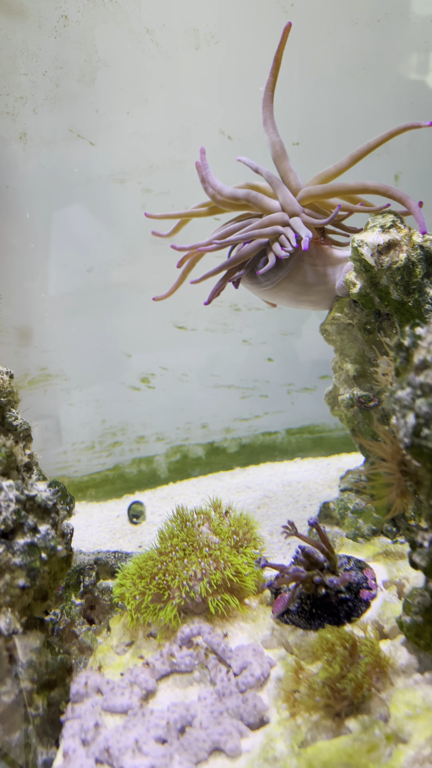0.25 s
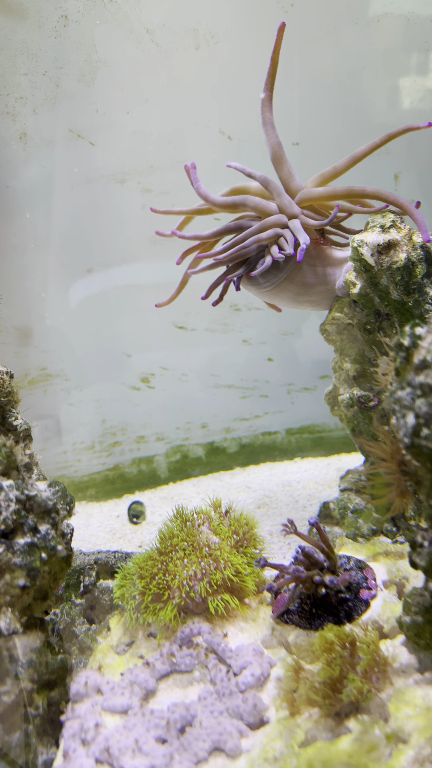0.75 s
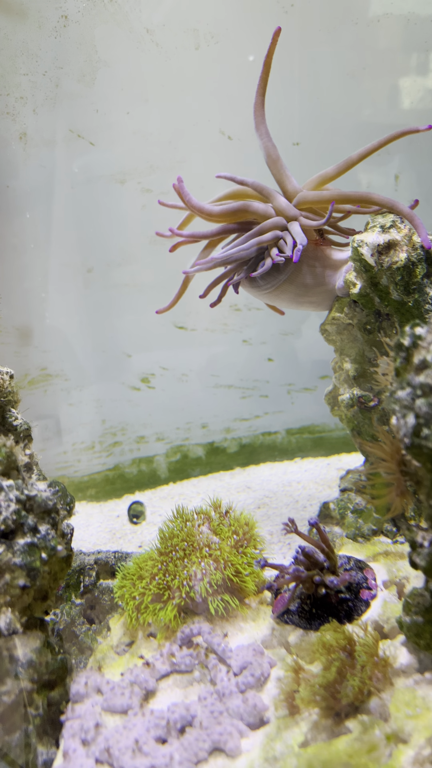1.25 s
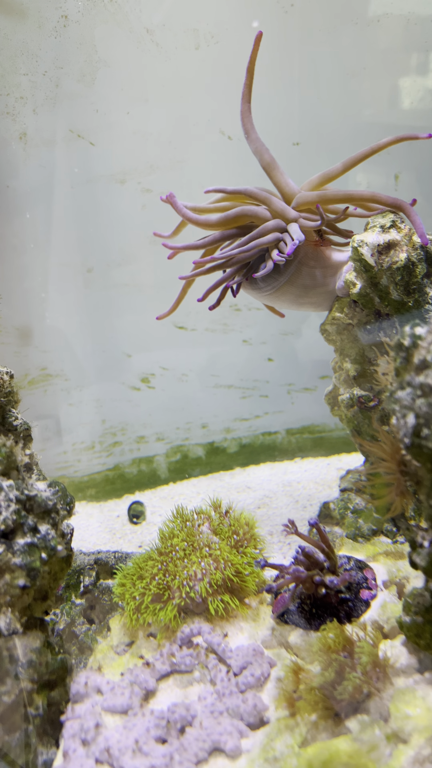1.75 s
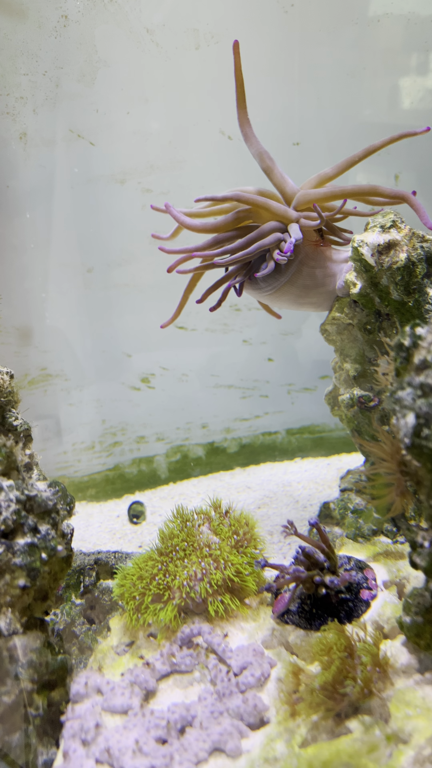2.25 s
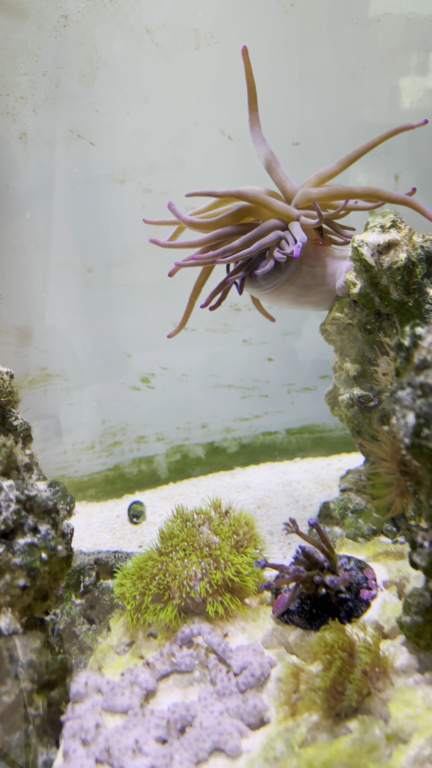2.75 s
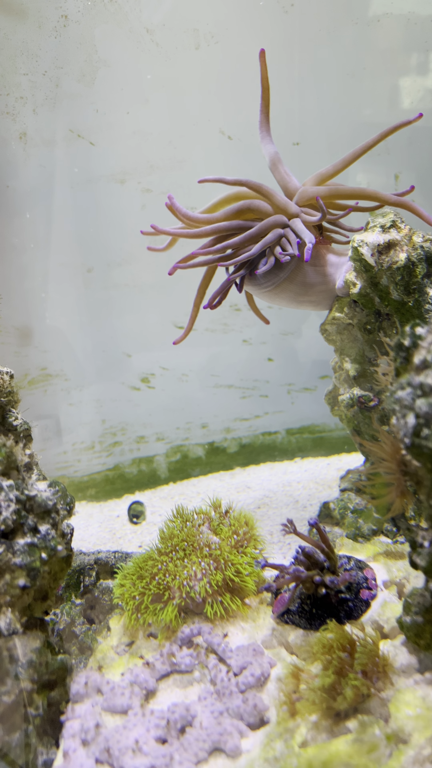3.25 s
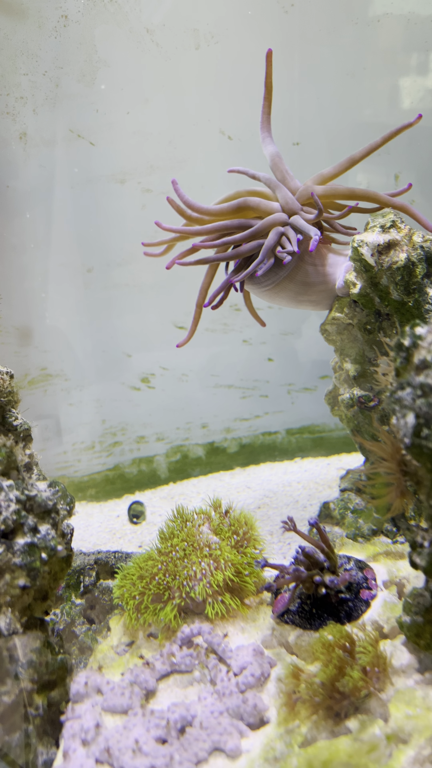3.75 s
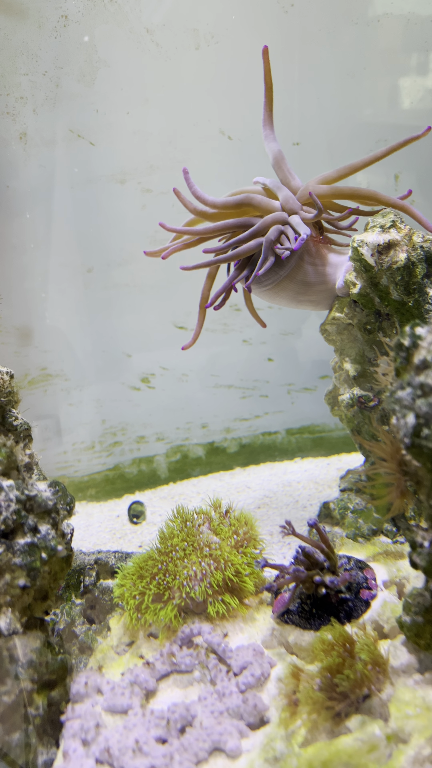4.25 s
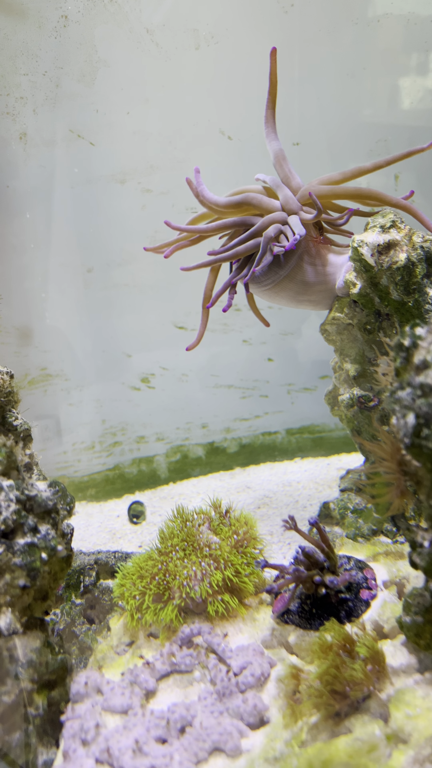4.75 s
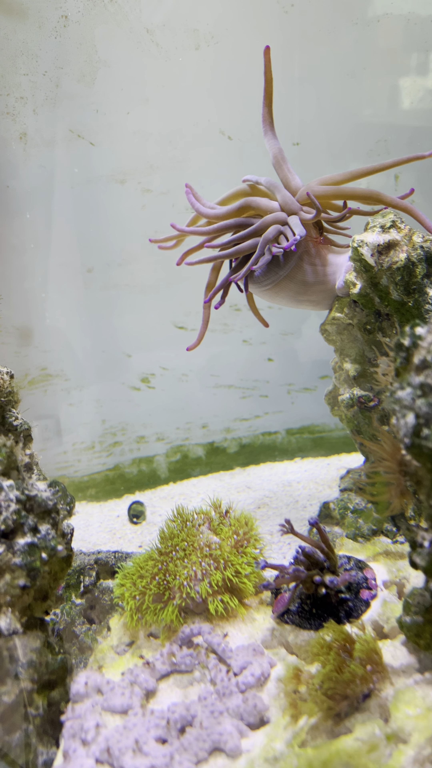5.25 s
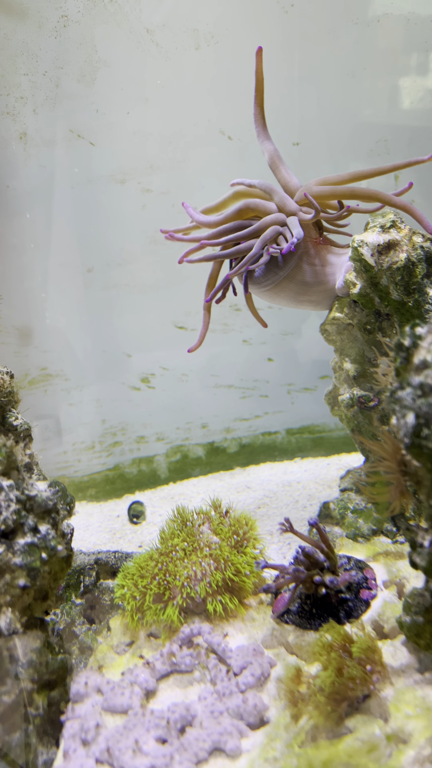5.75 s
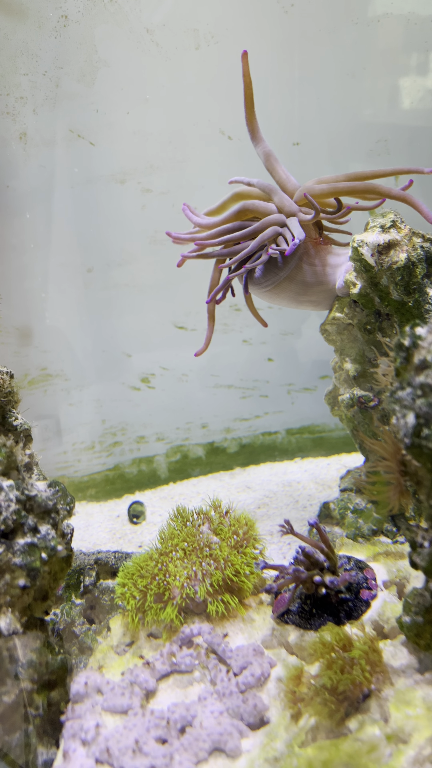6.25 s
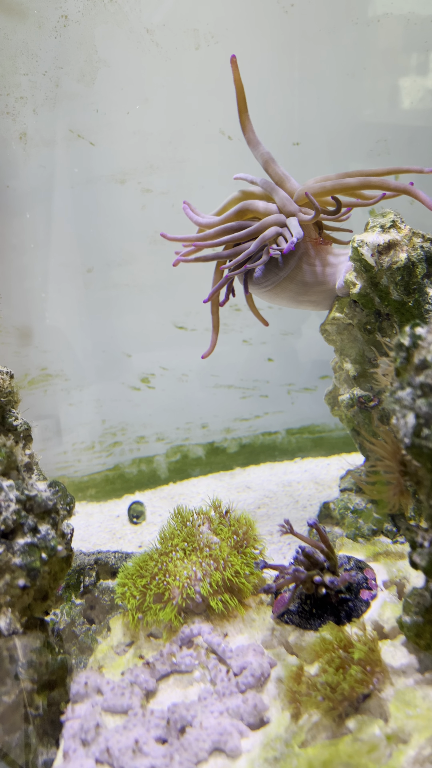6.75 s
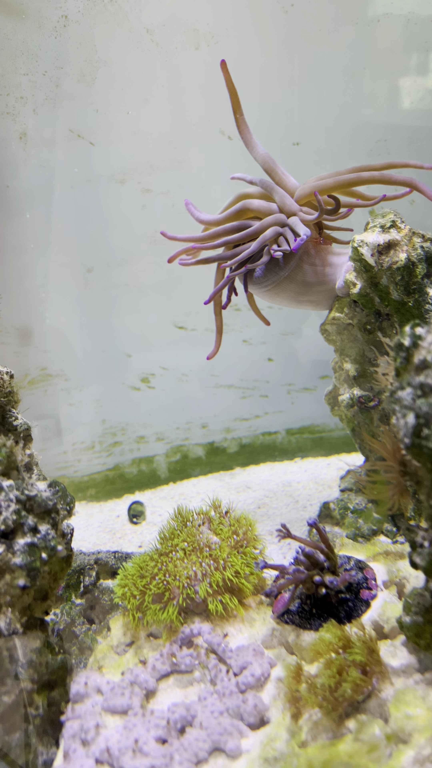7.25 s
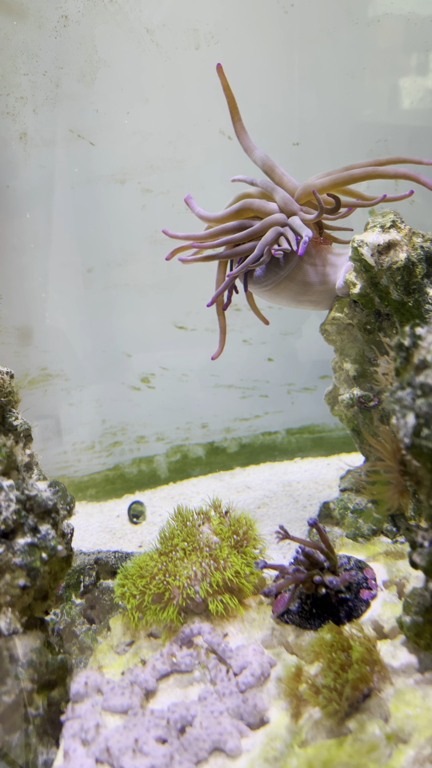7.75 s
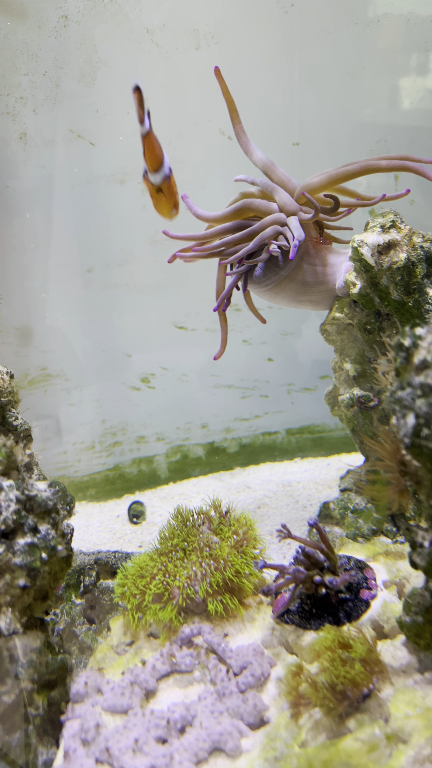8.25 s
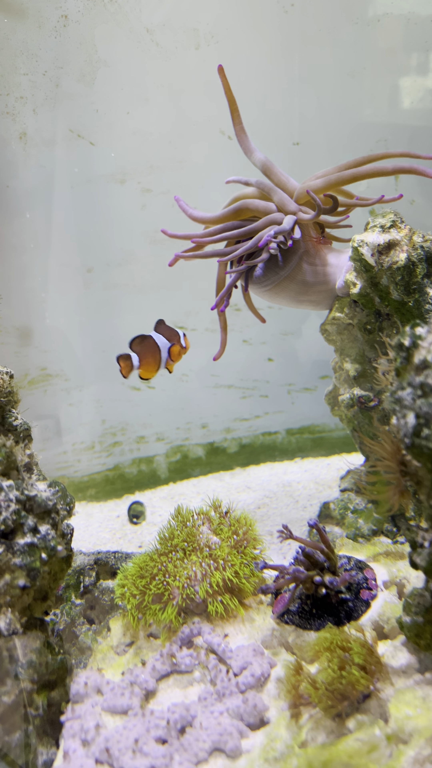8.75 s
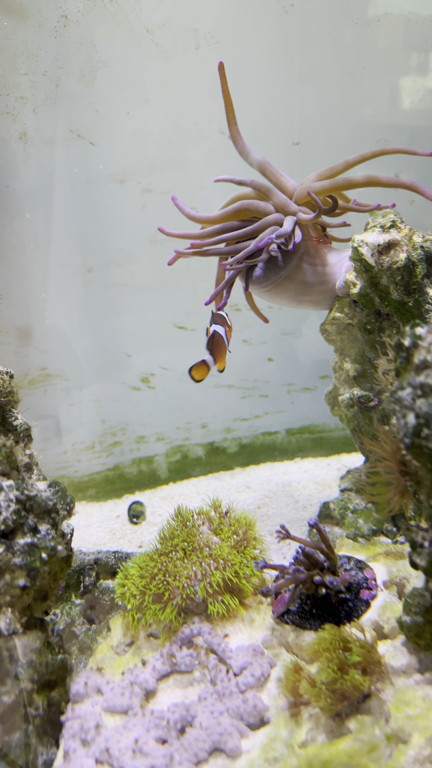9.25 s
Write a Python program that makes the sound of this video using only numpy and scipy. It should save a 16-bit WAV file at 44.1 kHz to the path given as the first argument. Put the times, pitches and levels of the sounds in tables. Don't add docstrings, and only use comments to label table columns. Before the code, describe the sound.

A tank pump hums deeply while thin water splashes and ticks; a few hard snaps early, a booming thud midway, gurgles late.

```python
import sys
import numpy as np
from scipy import signal
from scipy.fft import rfft, irfft, next_fast_len
from scipy.io import wavfile
from scipy.ndimage import uniform_filter1d

SR = 44100
rng = np.random.default_rng(int(sys.argv[2]) if len(sys.argv) > 2 else 0)


def transcribe(signal):
    frames = np.atleast_2d(signal).T
    limited = np.clip(frames, -1, 1)
    pcm = np.round(limited * 32767).astype(np.int16)
    wavfile.write(sys.argv[1], SR, pcm)


def invert_db(level):
    return 10 ** (np.asarray(level, dtype=float) / 20)


N = 419391
T = np.arange(N) / SR
FFT_LEN = next_fast_len(N + SR)
HZ = np.fft.rfftfreq(FFT_LEN, 1 / SR) + 1e-3

# [t/s, f/Hz, level/dB]
LORRY_ENGINE = [
    (0, 40.05, -64),
    (.15, 41.8, -45),
    (.38, 45.34, -39.5),
    (.6, 47.2, -45.5),
    (.9, 50.5, -44),
    (1.05, 54.7, -51),
    (1.2, 59.9, -49),
    (1.4, 60.3, -50),
]
# [multiple of mains, rms level/dB]
HUM_PARTIALS = [(1, -58), (2, -35), (3, -66), (4, -70), (5, -57), (6, -66), (7, -67), (8, -70), (9, -73),
                (10, -71), (11, -72), (12, -72), (14, -80), (15, -82)]
# [t/s, level/dB]
HUM_SWAY = [(0, 1), (1.7, 0.5), (2.4, 0), (3.7, 0), (4.5, 0), (9.6, 0)]
# [f/Hz, level/dB per Hz]
RUMBLE_COLOUR = [(22, -22.5), (35, -8), (48, -1.5), (70, -0.5), (88, -3), (105, -8.5), (150, -0.5),
                 (180, -4), (225, -13), (285, -1.5), (330, -10), (460, -12), (700, -22.5), (780, -30.5)]
# [t/s, level/dB]
RUMBLE_SWELL = [(0, -1.5), (1, 0.5), (2, 0.5), (3, 0), (4, 0), (5, -0.5), (6, -1), (7, -1), (8, 0),
                (9.6, -0.5)]
# [f/Hz, level/dB per Hz]
TRICKLE_COLOUR = [(350, -35), (600, -6), (726, -2.5), (892, -6.5), (1190, -7.5), (1650, -13), (2480, -20),
                  (3310, -29), (4410, -41.5), (4850, -28), (8970, -42), (11200, -47), (15700, -45)]
# [f/Hz, width/Hz, level/dB]
CAVITIES = [
    (2580, 710, -75.5),
    (3040, 200, -89),
    (4355, 300, -78),
    (5750, 670, -78),
    (8680, 420, -81.5),
]
# [t/s, level/dB]
JET_LEVEL = [(0, -95), (7.45, -95), (7.53, -68), (7.75, -70), (7.85, -85), (8.1, -82), (8.25, -73),
             (8.4, -75), (8.5, -70), (8.58, -76), (8.65, -90), (9.6, -95)]
# [f/Hz, level/dB per Hz]
SPLASH_COLOUR = [(2060, -21.5), (3500, -17.5), (4530, 2), (5370, 0), (6850, 4.5), (7800, 0.5), (8880, 3),
                 (10500, -6.5), (11800, -17.5), (15000, -46.5), (22000, -120)]
# [t/s, level/dB]
WEIR_FLOW = [(0, -73.5), (.4, -79.5), (.75, -77), (1.1, -70), (1.6, -72.5), (2.5, -69.5), (3.2, -72),
             (3.9, -73.5), (4.6, -80.5), (5.05, -67), (5.25, -81), (5.9, -75), (6.5, -79), (6.65, -74),
             (7.1, -72), (7.9, -75), (8.9, -80), (9.51, -88)]
# [peak t/s, level/dB, 10 dB rise/s, 10 dB fall/s, spray level/dB]
POURS = [(.48, -71, 0.3, 0.2, -24), (.93, -67, 0.07, 0.1, -21), (.975, -60.5, 0.1, -0.04, -17),
         (1.3, -62, 0.26, 0.12, -11), (2.045, -58.5, -0.11, 0.3, -24), (2.15, -62, .08, 0.15, -22),
         (2.27, -59.5, .09, 0.1, -13.5), (2.89, -61.5, 0.18, 0.15, -21), (3.345, -66.5, -0.07, 0.14, -11),
         (3.48, -63.5, 0.07, 0, -25), (3.68, -59.5, 0.13, 0.11, -19), (4.06, -70, -0.4, 0.3, -16),
         (4.16, -63.5, 0.06, 0.12, -13), (4.39, -66.5, .12, 0.1, -15.5), (4.48, -70, 0, -0.3, -23),
         (6.96, -65.5, -0.4, 0.06, -15), (8.18, -65.5, 0.24, 0.1, -26), (9.05, -64, 0.16, 0.22, -22),
         (9.28, -69, .07, 0.2, -16)]
# [peak t/s, level/dB, 10 dB rise/s, 10 dB fall/s, spray level/dB]
SPURTS = [(0, -64, .01, 0.015, -7), (.26, -59.5, 0.006, 0.023, -23), (.83, -66, 0.023, 0.031, -8.5),
          (1.85, -66.5, 0.14, 0.085, -12.5), (1.99, -59, 0.035, 0.034, -11.5), (2.68, -70, .03, 0.066, -13),
          (3.58, -57.5, 0.049, 0.052, -19), (3.66, -47, 0.0085, .03, -26), (4.72, -53, 0.028, 0.055, -18.5),
          (5.35, -71, 0.066, .1, -31), (5.61, -78, 0.027, 0.17, -29), (7.52, -55.5, 0.032, 0.17, -14.5),
          (7.6, -55.5, 0.11, 0.12, -15), (7.69, -60, 0.11, 0.087, -12.5), (7.78, -58, 0.15, 0.061, -16),
          (8.54, -61.5, 0.12, 0.058, -23), (8.69, -62, .03, 0.07, -15.5), (8.73, -60.5, .06, 0.095, -16)]
# [t/s, peak level/dB, f/Hz]
TICKS = [(0.055, -57, 8750), (.4805, -47.5, 8800), (1.428, -54, 3200), (1.731, -57, 3150),
         (2.408, -61.5, 10600), (2.511, -58, 9400), (2.641, -56, 10300), (2.674, -50.5, 9150),
         (2.714, -56, 8500), (3.032, -58, 11000), (3.478, -54, 9200), (3.522, -64, 11200),
         (3.849, -57, 8460), (3.868, -56, 5500), (3.907, -53, 8200), (3.99, -58, 8900), (4.19, -53.5, 6000),
         (4.299, -56, 4350), (4.353, -59, 10100), (4.552, -65, 11200), (4.606, -60, 5050),
         (4.957, -58, 9200), (5.115, -58, 9000), (5.115, -60, 10300), (5.309, -48, 690), (5.332, -59, 5700),
         (5.395, -65, 9650), (5.509, -57, 8300), (5.62, -59, 9400), (5.701, -60, 5500), (5.819, -67, 7900),
         (5.868, -55.5, 9200), (5.884, -69, 12600), (5.915, -55, 3080), (5.915, -58, 5500),
         (6.086, -64.5, 9200), (6.137, -65, 9400), (6.165, -69, 14200), (6.245, -57, 9050),
         (6.302, -63, 10300), (6.357, -60, 8300), (6.404, -67, 12400), (6.563, -58, 9200),
         (6.637, -61, 8300), (6.645, -67, 10300), (6.785, -66, 9600), (7.998, -64, 9400),
         (8.076, -63, 11500), (8.341, -63, 10300), (8.674, -52, 5050), (8.68, -52.5, 2780),
         (8.731, -58, 11500), (9.1, -53, 2830), (9.21, -54, 8050), (9.268, -68, 12600), (9.288, -54, 1840),
         (9.351, -64, 8500), (9.499, -49, 4600)]
# [t/s, peak level/dB, f/Hz]
CRACKLES = [(.247, -58, 7500), (.3913, -53, 6960), (.3915, -51, 3300), (.398, -53, 2600),
            (.474, -44.5, 1810), (.4745, -52, 4900), (.4772, -52, 7500), (3.677, -41.5, 7800),
            (8.171, -52, 2900), (8.194, -52, 2400), (8.198, -54.5, 3000), (8.21, -51.5, 900),
            (8.222, -50, 800), (8.298, -51.5, 2600), (8.308, -50.5, 1700), (8.329, -47.5, 600),
            (8.352, -52, 1300), (8.364, -52.5, 1500), (8.43, -54, 2000)]
# [t/s, peak level/dB, f/Hz,
# ring/cycles]
PINGS = [(0.3155, -47, 4900, 24), (.778, -67, 8200, 40), (.802, -55.5, 13700, 270), (0.807, -55, 8800, 260),
         (.812, -61, 7430, 200), (.816, -52, 8800, 280), (.818, -56, 12700, 200), (.81, -59, 10200, 200),
         (.82, -57, 14700, 250), (.827, -59, 11700, 200), (.823, -59, 6370, 250), (.826, -55, 7900, 150),
         (.831, -56, 7000, 170), (0.83, -58, 8740, 250), (3.322, -59, 4400, 50), (4.105, -62, 8600, 90),
         (1.8377, -52.5, 7460, 140), (2.797, -50.5, 670, 17), (5.276, -56.5, 4200, 30),
         (5.3404, -54, 5500, 29), (5.622, -54, 5750, 89), (6.225, -50, 1185, 28), (6.808, -68, 9050, 300),
         (7.035, -73, 4320, 200), (8.2, -54, 890, 30), (8.355, -45.5, 600, 26)]
# [t/s, peak level/dB, f/Hz, length/s]
GURGLES = [(.972, -54.5, 1500, 0.064), (.973, -56, 5000, 0.031), (7.317, -68, 9000, .06),
           (8.16, -60.5, 3040, 0.32), (8.198, -59, 2100, .045), (8.234, -52.5, 700, 0.069),
           (8.268, -59.5, 1200, 0.22), (8.282, -59.5, 2900, 0.076), (8.295, -62, 2200, 0.2),
           (8.313, -55.5, 800, 0.055), (8.334, -61, 1450, 0.1), (8.347, -65, 2500, 0.063)]
# [t/s, peak level/dB, f/Hz, ring/cycles, tail/s]
SNAPS = [(1.2323, -34, 6000, 3, 0.0045), (1.2324, -25, 8000, 5.7, 0.0045), (1.2323, -33, 2600, 3, 0.02),
         (1.2326, -35, 3600, 3.6, 0.025), (1.2326, -25, 11000, 4, .008), (1.26, -47.5, 6000, 3, 0.092),
         (1.25, -46, 14000, 4, .16), (1.2317, -19.5, 14800, 7.4, 0.044), (1.2326, -31, 5700, 6.1, 0.025),
         (1.2371, -30, 8530, 3, .03), (1.2368, -35, 2500, 6.2, 0.019), (1.2375, -30, 11000, 5, .01),
         (1.2378, -30, 14800, 6, .01), (1.245, -42, 2900, 4, .03), (1.2386, -41, 8800, 14, 0.068),
         (2.196, -28, 1240, 2.8, 0.012), (2.1957, -37.5, 1900, 5, .008), (2, -44.5, 2600, 6, .008),
         (2.1985, -40, 800, 5, .008), (2.2112, -29, 1300, 2.5, .006), (2.209, -42.5, 2600, 4.6, .008),
         (2.215, -41.5, 1800, 5, .01), (3.6488, -30, 8000, 16, 0.038), (3.6488, -32, 9600, 20, .03),
         (3.6505, -43, 980, 3, 0.0092), (3.3, -45, 2800, 4, .01), (3.6544, -34.5, 780, 6, 0.043),
         (3.682, -43.5, 3550, 12, .05), (3.6548, -29.5, 9500, 14, 0.073), (3.6553, -37, 7000, 12, 0.037),
         (3.6555, -36, 3700, 10, 0.12), (3.6549, -36.5, 16000, 11, .05), (3.655, -43.5, 2100, 3.4, .07),
         (3.66, -44, 1050, 3, 0.06), (3.655, -33, 7000, 14, 0.03), (3.664, -41.5, 3530, 11, .06)]
# [t after the knock/s, peak level/dB, f/Hz, length/s]
KNOCK_CRACK = [
    (0.0011, -41, 900, .015),
    (0, -45, 1900, .012),
    (0.013, -42, 1020, 0.065),
    (0.0026, -40.5, 620, 0.062),
    (0.0029, -40.5, 440, 0.17),
    (.004, -56.5, 5900, 0.087),
    (.017, -56, 9300, .08),
    (.012, -50.5, 15000, .06),
    (0.006, -46, 2400, 0.06),
]
# [f/Hz, level/dB, t60/s, delay/s, rise/s]
CABINET_MODES = [(80, -10, 0.14, .008, 0.014), (67.3, -5.5, .19, .05, 0.044), (132.5, -3, .13, .03, .02),
                 (147, -13, .18, .08, .025), (151, 1.5, .14, .007, 0.0075), (201, -10.5, 0.38, .022, 0.025),
                 (212, -12, .12, .008, .008), (263.6, -8, .15, .033, 0.024), (327, -17.5, .1, .004, 0.0087),
                 (360, -21, .13, .038, .015), (384, -19, 0.086, .005, .006),
                 (515, -28.5, .14, .003, 0.0065), (568, -27.5, 0.14, .002, .004),
                 (660, -19, .035, 0.0013, .0005)]
# [f/Hz, side minus mid level/dB]
STEREO_WIDTH = [(60, -32.5), (110, -44.5), (200, -21), (380, -8), (700, 0), (1290, -3.5), (2380, -4),
                (4400, -0.5), (8120, -3), (15000, -7.5)]
# [f/Hz, level/dB]
MIC_PORT = [(100, 4), (9500, 0.5), (12500, -10.5), (14500, -6.5), (20000, -8)]

MAINS_HZ = 59.986
RUMBLE_DB, TRICKLE_DB = -45.5, -59.5
JET_HZ, JET_WIDTH_HZ = 6500, 900
STEADY_BODY_DB, FLOW_BODY_DB, POUR_BODY_DB, SPURT_BODY_DB = -69.5, -3, 0.5, -5
FLOW_SPRAY_DB = -16.5
KNOCK_S, KNOCK_DB = 5.029, -9
ROOM_T60_S = 0.3
TOP_HZ = 15720


def level(x, db):
    return x * invert_db(db) / np.sqrt(np.mean(x ** 2))


def over_time(table):
    return np.interp(T, *np.transpose(table))


def shape(table):
    hz, db = np.transpose(table)
    return invert_db(np.interp(np.log(HZ), np.log(hz), db, left=-120, right=-120))


def filt(x, gain):
    return irfft(rfft(x, FFT_LEN) * gain, FFT_LEN)[..., :N]


def bump(hz, octaves):
    return np.exp(-.5 * (np.log2(HZ / hz) / (octaves / 2)) ** 2)


def resonance(hz, width_hz):
    return 1 / (1 + ((HZ - hz) / (width_hz / 2)) ** 2)


def walk(rate):
    k = int(SR / rate)
    steps = np.repeat(rng.standard_normal(N // k + 1), k)
    return uniform_filter1d(steps, k)[:N]


def spread(mid, side):
    hz, db = np.transpose(STEREO_WIDTH)
    side = filt(side, invert_db(np.interp(np.log(HZ), np.log(hz), db)))
    return np.array([mid + side, mid - side])


def grainy(spread_db):
    size = invert_db(spread_db * np.minimum(rng.exponential(size=N), 5))
    return spread(size * rng.standard_normal(N), size * rng.standard_normal(N))


def decay(t, t60):
    return np.exp(-np.log(1000) * t / t60)


def ring(t, hz, t60):
    return decay(t, t60) * np.sin(2 * np.pi * hz * t)


def room(x, tail_db):
    t = T[:SR // 2]
    tail = rng.standard_normal((2, len(t))) * decay(t, ROOM_T60_S) * (1 - np.exp(-t / 0.002))
    tail = tail / np.sqrt(np.sum(tail ** 2, axis=1, keepdims=True))
    left, right = filt(x, rfft(tail, FFT_LEN))
    return x + invert_db(tail_db) * spread(left, right)


def lorry():
    s, hz, db = np.transpose(LORRY_ENGINE)
    turn = 2 * np.pi * np.cumsum(np.interp(T, s, hz)) / SR
    tone = np.sin(turn) + invert_db(-10.5) * np.sin(2 * turn)
    tone = tone + invert_db(-2.5) * np.sin(4 * turn) * np.exp(-T / .5)
    return np.sqrt(2) * tone * invert_db(np.interp(T, s, db, right=-120))


def pump():
    hum = np.zeros(N)
    for multiple, db in HUM_PARTIALS:
        cycles = multiple * MAINS_HZ * T + rng.random()
        hum += np.sqrt(2) * invert_db(db) * np.sin(2 * np.pi * cycles)
    hum = hum * invert_db(over_time(HUM_SWAY))
    hum_side = invert_db(-35) * np.array([[1], [-1]]) * np.roll(hum, 90)
    rumble = level(filt(grainy(0), shape(RUMBLE_COLOUR)), RUMBLE_DB)
    rumble = rumble * invert_db(over_time(RUMBLE_SWELL) + walk(6))
    return hum + hum_side + rumble


def trickle():
    colour = shape(TRICKLE_COLOUR)
    source = grainy(1.5)
    bells = [bump(hz, .5) for hz in 700 * 2. ** np.arange(0, 4.6, .5)]
    total = sum(bells) + 1e-9
    fine = sum(filt(source, colour * bell / total) * invert_db(1.2 * walk(12)) for bell in bells)
    return level(fine, TRICKLE_DB)


def cavities_and_jet():
    air = grainy(0.96)
    sung = 0
    for hz, width_hz, db in CAVITIES:
        sung = sung + level(filt(air, resonance(hz, width_hz)), db) * invert_db(3 * walk(30))
    jet = level(filt(air, resonance(JET_HZ, JET_WIDTH_HZ)), 0)
    return sung + jet * invert_db(over_time(JET_LEVEL))


def fizz():
    out = 0
    for hz in 3400 * 2 ** np.arange(0, 2.2, .15):
        size_db = 3 * np.minimum(rng.exponential(size=N), 2) - 6 * hz / 10000
        bursts = (rng.random(N) < 10 / SR) * invert_db(size_db)
        out = out + signal.oaconvolve(bursts, ring(T[:600], hz, 90 / hz))[:N]
    return invert_db(-71) * out


def gush(table):
    power, spray = 0, 0
    for s, db, rise, fall, spray_db in table:
        steps = np.where(T < s, (s - T) / max(rise, .003), (T - s) / max(fall, .003))
        size = invert_db(db - 10 * steps) ** 2
        power = power + size
        spray = spray + size * invert_db(spray_db) ** 2
    return power, spray


def surges():
    flow = invert_db(over_time(WEIR_FLOW)) ** 2
    pour, pour_spray = gush(POURS)
    spurt, spurt_spray = gush(SPURTS)
    heavy = invert_db(STEADY_BODY_DB) ** 2 + flow * invert_db(FLOW_BODY_DB) ** 2
    heavy = heavy + pour * invert_db(POUR_BODY_DB) ** 2 + spurt * invert_db(SPURT_BODY_DB) ** 2
    misty = flow * invert_db(FLOW_SPRAY_DB) ** 2 + pour_spray + spurt_spray
    grains = grainy(3.15) * invert_db(walk(25))
    splash = level(filt(grains, shape(SPLASH_COLOUR)), 0)
    spray = level(filt(grains, bump(15400, 0.34)), 0)
    body = level(filt(grains, bump(2490, 0.98)), 0)
    return np.sqrt(flow + pour + spurt) * splash + np.sqrt(misty) * spray + np.sqrt(heavy) * body


def drop(t, hz, cycles, scatter_db, length):
    edges = [hz / (1 + 0.99 / cycles ** .5), hz * (1 + 0.88 / cycles ** .5)]
    band = signal.butter(3, np.clip(edges, 100, 20000), "band", fs=SR, output="sos")
    scatter = signal.sosfilt(band, rng.standard_normal(len(t)))
    scatter = scatter / np.std(scatter) * decay(t, 1.54 * max(length, .004))
    swell = 1.5 * (1 - np.exp(-min(3, 20 / max(cycles, 1)) * hz * t))
    return swell * ring(t, hz, 2 * cycles / hz) + invert_db(scatter_db) * scatter


def drops():
    # t/s, level/dB, f/Hz, ring/cycles, scatter level/dB, scatter length/s
    rows = [(s, db, hz, 22, -12, .025) for s, db, hz in TICKS]
    rows += [(s, db, hz, 5, -10, .015) for s, db, hz in CRACKLES]
    rows += [(s, db, hz, cycles, -19, .04) for s, db, hz, cycles in PINGS]
    rows += [(s, db, hz, 4, -2, length) for s, db, hz, length in GURGLES]
    rows += [(KNOCK_S + s, db, hz, 4, -2, length) for s, db, hz, length in KNOCK_CRACK]
    rows += [(s, db, hz, cycles, -14, tail) for s, db, hz, cycles, tail in SNAPS]
    out, t = np.zeros(N), T[:SR // 6]
    for s, db, hz, cycles, scatter_db, length in rows:
        start = int(s * SR)
        out[start:start + len(t)] += invert_db(db) * drop(t, hz, cycles, scatter_db, length)[:N - start]
    return out


def knock():
    out, start = np.zeros(N), int(KNOCK_S * SR)
    for hz, db, t60, delay, rise in CABINET_MODES:
        t = np.clip(T[:SR] - delay, 0, None)
        swell = 1 - np.exp(-t / max(rise, 1e-4))
        out[start:start + SR] += invert_db(db) * swell * ring(t, hz, t60)
    return room(invert_db(KNOCK_DB) * out, -14)


def scene():
    background = lorry() + pump()
    water = trickle() + cavities_and_jet() + surges()
    spots = filt(fizz() + drops(), shape(MIC_PORT))
    return background + water + room(spots, -6.0) + knock()


def top_cut(x):
    return signal.sosfilt(signal.butter(12, 16330, fs=SR, output="sos"), x)


def record(dry):
    lag = np.exp(-2j * np.pi * HZ * np.array([[.8], [0]]) / SR)
    mix = filt(dry, lag * (HZ < TOP_HZ))
    return top_cut(mix)


dry = scene()
out = record(dry)
transcribe(out)
```